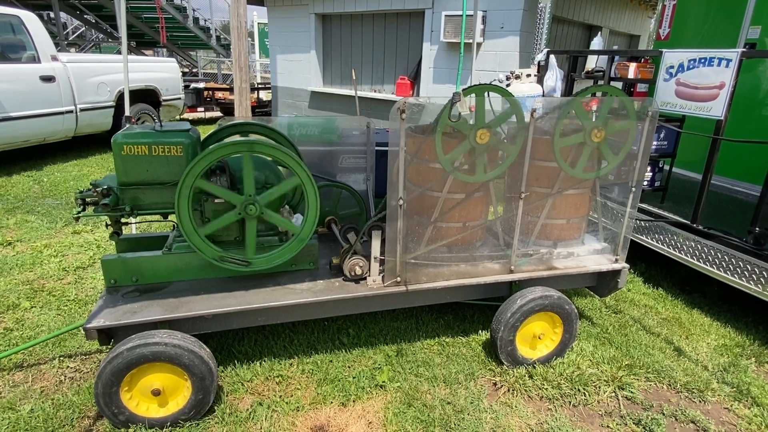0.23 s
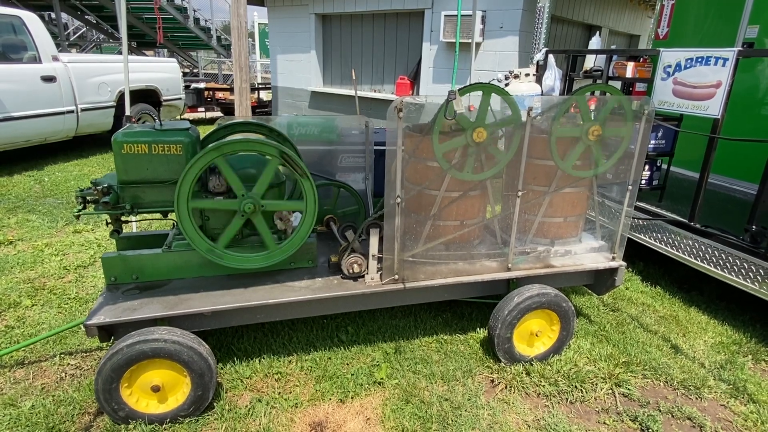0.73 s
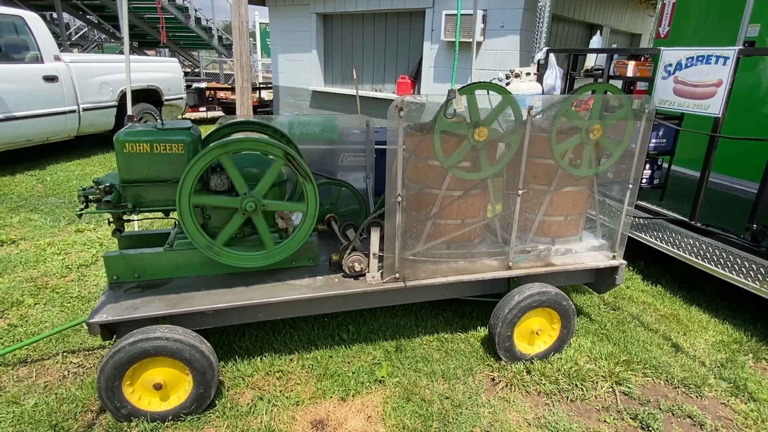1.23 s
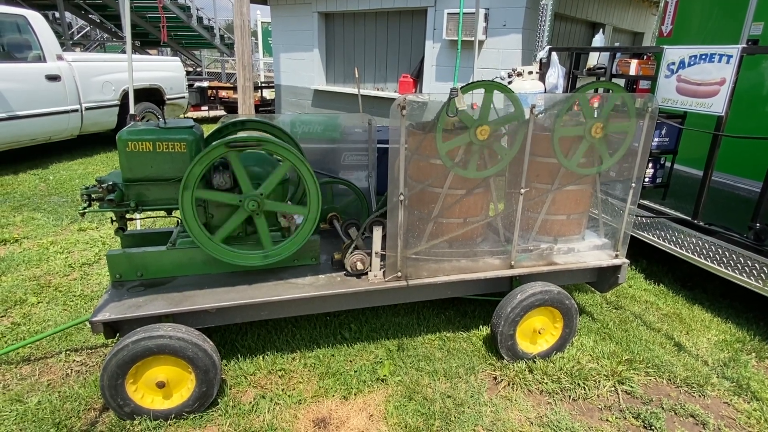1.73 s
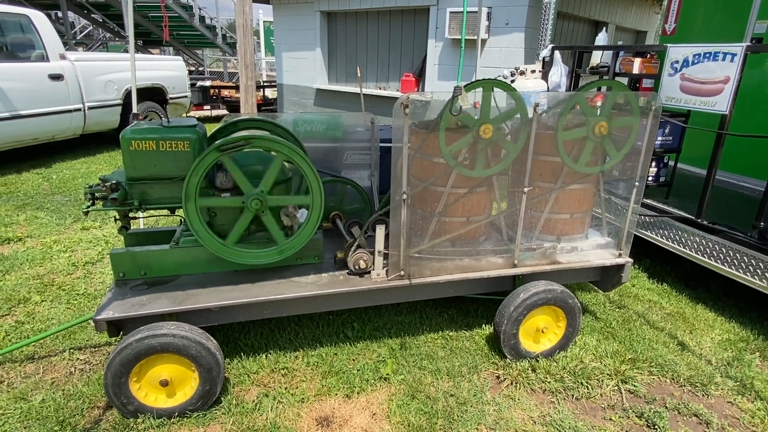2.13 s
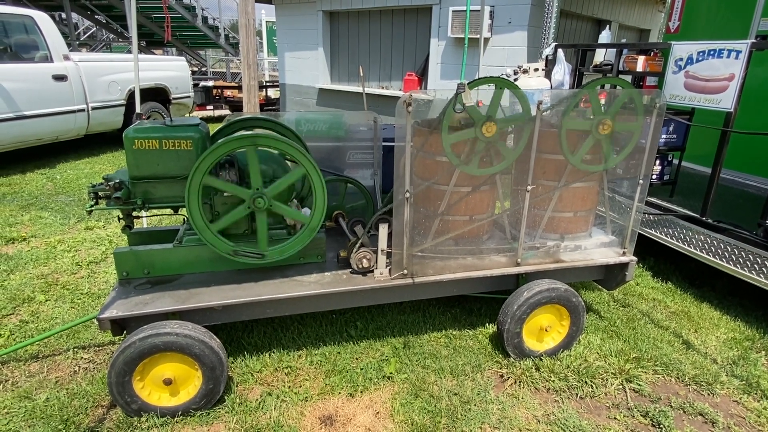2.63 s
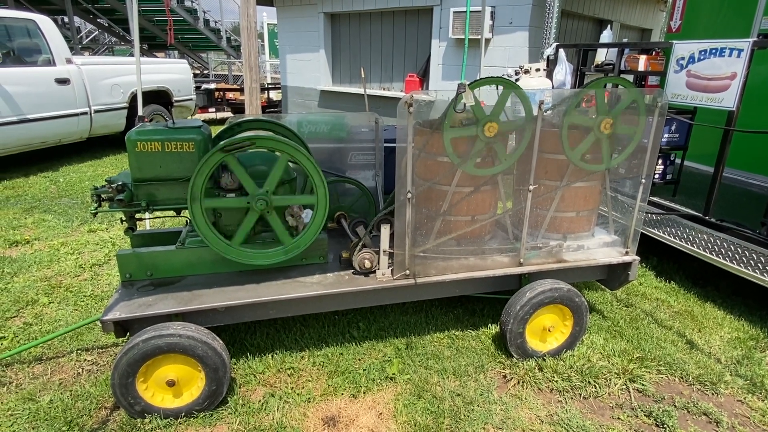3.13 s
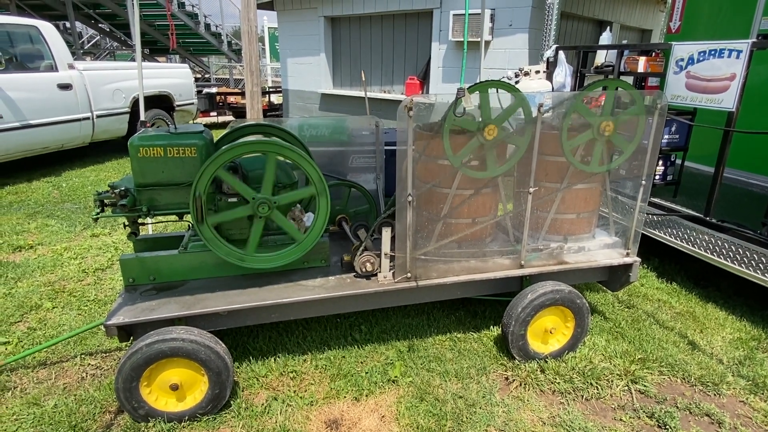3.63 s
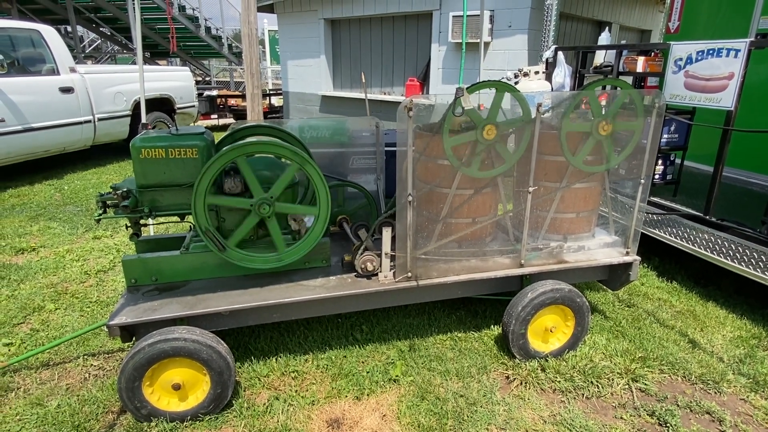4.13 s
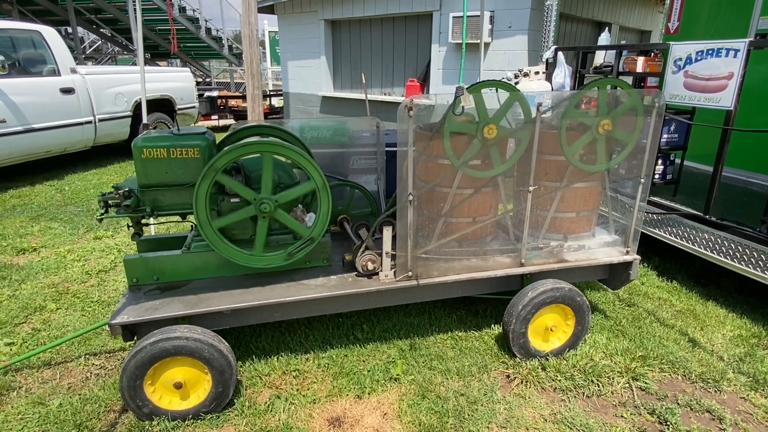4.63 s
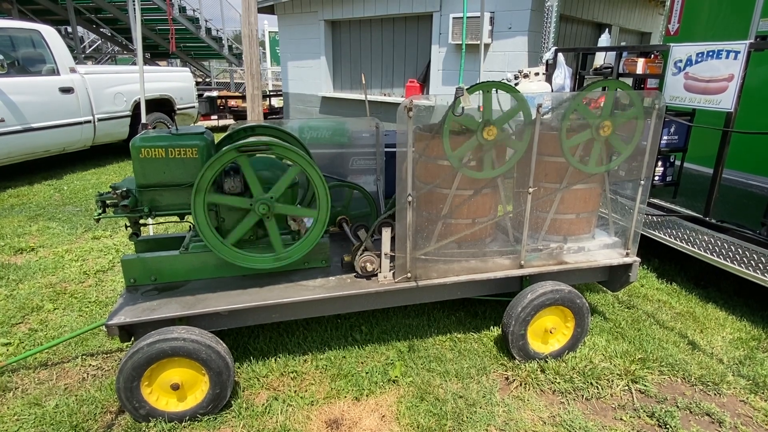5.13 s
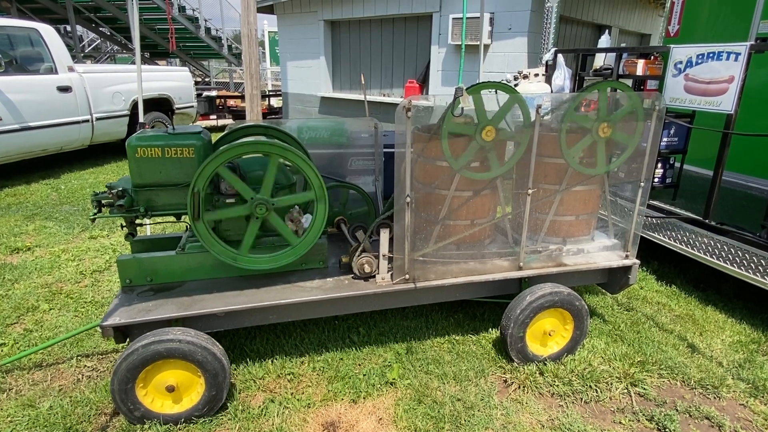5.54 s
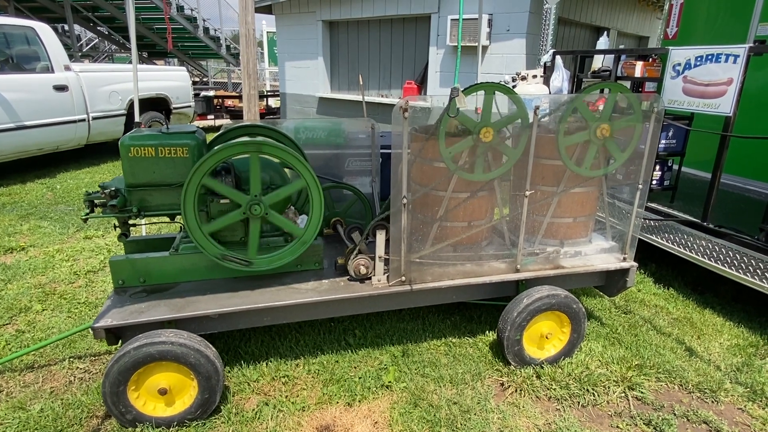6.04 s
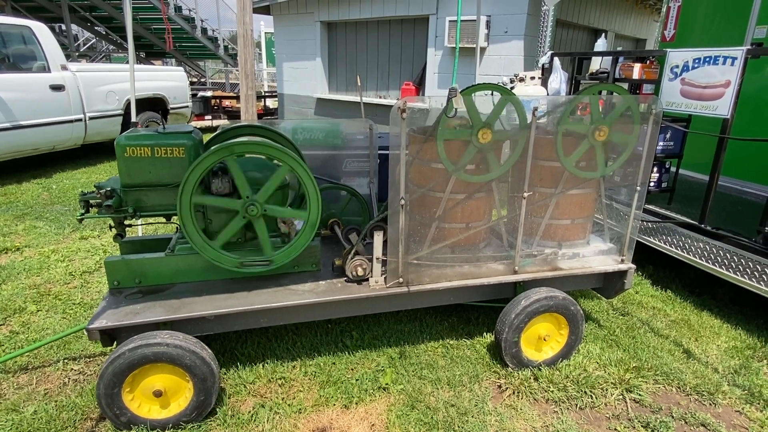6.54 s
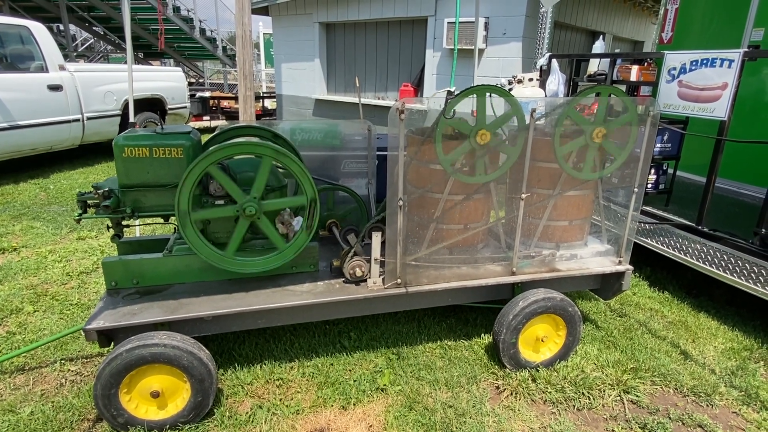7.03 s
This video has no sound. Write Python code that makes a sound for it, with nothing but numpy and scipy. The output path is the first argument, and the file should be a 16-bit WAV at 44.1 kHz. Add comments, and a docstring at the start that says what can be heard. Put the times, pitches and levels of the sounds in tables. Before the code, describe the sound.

Breathy flywheel chuffing about seven times a second, broken by three gulp-snap-bark firings, over lumpy ice grinding, knocks and a distant engine drone.

```python
"""Hit-and-miss engine turning ice cream freezers

The engine coasts ever slower between firings: each flywheel turn pumps a swish of shaped noise.
Three times it gulps (chattering noise), snaps its igniter (noise and sines), barks (noise jet, pop) and speeds up.
Ice grinds in the freezers (lumpy noise) and cracks (falling knocks); a cam grumbles, chirps and a rush come in.
Another engine drones further off (harmonics, low noise); the gain ducks under loud sounds."""
import sys
import numpy as np
from scipy import signal
from scipy.fft import rfft, irfft, next_fast_len
from scipy.io import wavfile
from scipy.ndimage import uniform_filter1d, minimum_filter1d, map_coordinates

SR = 44100
rng = np.random.default_rng(int(sys.argv[2]) if len(sys.argv) > 2 else 0)


def wav_record(signal):
    """Record a signal, one row per channel, as 16-bit PCM in the file named by sys.argv[1]."""
    frames = np.transpose(np.atleast_2d(signal))
    bounded = np.clip(frames, -1, 1)
    # unit amplitude maps onto the largest positive 16-bit level
    quanta = np.round(bounded * 32767).astype(np.int16)
    wavfile.write(sys.argv[1], SR, quanta)


N = 321048
T = np.arange(N) / SR


def amp(db):
    """Decibels to gain."""
    return 10 ** (np.asarray(db) / 20)


def unit(x):
    """Scaled to rms 1."""
    return x / np.sqrt(np.mean(x ** 2) + 1e-20)


def along(points, hz):
    """(Hz, value) points read on a log frequency axis."""
    f, v = np.transpose(points)
    return np.interp(np.log(hz + 1), np.log(f + 1), v)


def curves(rows):
    """One value per sample for each column after the time."""
    s, *cols = np.transpose(rows)
    return [np.interp(T, s, c) for c in cols]


def wobble(rate_hz):
    """Smooth random curve with rate_hz knots a second."""
    knots = rng.standard_normal(int(N * rate_hz / SR) + 4)
    return map_coordinates(knots, [T * rate_hz])


def filtered(x, response):
    """x times a response of frequency."""
    size = next_fast_len(N + 8192)
    hz = np.fft.rfftfreq(size, 1 / SR)
    return irfft(rfft(x, size) * response(hz), size)[..., :N]


def noise(spectrum, grain=1, ripple_db=0, spacing_hz=55):
    """Two unrelated noises, jointly rms 1; grain clumps them, ripple_db makes the colour randomly uneven."""
    knots = rng.standard_normal(2000)

    def colour(hz):
        ripple = np.interp(hz / spacing_hz, np.arange(len(knots)), knots)
        return amp(along(spectrum, hz) + ripple_db * ripple)
    return unit(filtered(grain * rng.standard_normal((2, N)), colour))


def resonances(modes):
    """Two unrelated noises, jointly rms 1, ringing in (Hz, width Hz, dB) modes."""
    def body(hz):
        return sum(amp(db) * 1j * hz * w / (c * c - hz * hz + 1j * hz * w) for c, w, db in modes)
    return unit(filtered(rng.standard_normal((2, N)), body))


def patchy(x, depth_db):
    """Colour shifts in random patches some hundred Hz wide and about half a turn long."""
    z = signal.stft(x, nperseg=512)[2]
    field = uniform_filter1d(rng.standard_normal(z.shape[1:]), size=5, axis=0)
    field = uniform_filter1d(field, size=11, axis=1)
    return unit(signal.istft(z * amp(depth_db * unit(field)), nperseg=512)[1][:, :N])


def burst(s, rise, hold, t60):
    """Envelope that opens at s, stays open until hold, then dies away (all in s)."""
    age = np.maximum(T - s, 0)
    return np.minimum(age / rise, 1) * amp(-60 * np.clip((age - hold) / t60, 0, 3))


def lobe(turns, at, sharp):
    """Swell once a turn, centred on the angle at (turns)."""
    return np.exp(sharp * (np.cos(2 * np.pi * (turns - at)) - 1))


KNOCK_STRETCH = 0.361  # growth of the period, s per s


def knock(top_hz, end_hz):
    """A few cycles that fall in pitch from top_hz and die out around end_hz."""
    age = np.arange(SR // 30) / SR
    hz = 1 / (1 / top_hz + age * KNOCK_STRETCH)
    cycles = np.cumsum(hz) / SR
    envelope = np.minimum(2 * cycles, 1) * np.sqrt(hz / top_hz) / (1 + (end_hz / hz) ** 6)
    return np.sin(2 * np.pi * cycles) * envelope


def add(track, s, sound):
    """Mixes a short sound into a track at time s."""
    track[round(s * SR):][:len(sound)] += sound


# firings; exhaust levels are before its common gain:
# ignition t/s, snap level/dB, jet level/dB, pipe ring level/dB, thump level/dB, pop level/dB, pop end f/Hz
FIRINGS = [(0.61, -11, -5.5, -10.5, -31, -20, 450), (3.308, -13, -5, -30, -32.5, -38, 450),
           (5.7373, -12, -5.5, -32, -19, -21, 190)]
START_TURNS, START_TURNS_PER_S = -.1122, 7.0992
DRAG_TURNS_PER_S2, KICK_TURNS_PER_S, POWER_S = .555, 1.4173, .06


def crank():
    """Flywheel angle (turns) and speed (turns/s): steady drag, each firing kicks it on."""
    kicks = sum(np.clip((T - s) / POWER_S, 0, 1) for s, *_ in FIRINGS)
    speed = START_TURNS_PER_S - DRAG_TURNS_PER_S2 * T + KICK_TURNS_PER_S * kicks
    return START_TURNS + np.cumsum(speed) / SR, speed


# slow drift of the swish: t/s, level change/dB
SWISH_DRIFT = [(0, 0.4), (2.9, -0.5), (3.7, 1.5), (4.85, -9.5), (5.1, -2), (6, 1), (7.28, -1)]
# exhaust valve: shut this long before ignition, open this long after
SHUT_S, OPEN_S, MUTE_DB = 0.084, .0675, -28
# drive at 8 turns/s, growth in dB per turn/s, random variation
SWISH_DRIVE_DB, SWISH_PER_SPEED_DB, SWISH_VARIES_DB = -27, 1, 0.65


def swish_level(speed):
    """Drive in dB: a faster piston pumps harder; hardly any air passes with the exhaust valve shut."""
    shut = sum(1.0 * ((T > s - SHUT_S) & (T < s + OPEN_S)) for s, *_ in FIRINGS)
    pumping = SWISH_DRIVE_DB + SWISH_PER_SPEED_DB * (speed - 8)
    return pumping + curves(SWISH_DRIFT)[0] + SWISH_VARIES_DB * wobble(7.1) + MUTE_DB * shut


# air colour: f/Hz, relative level/dB per Hz
SWISH_COLOUR = [(100, -34), (300, -29), (600, -8.5), (1100, -7), (1400, -1), (2100, -1.5), (2700, -2),
                (4100, -3), (5000, -4.5), (6200, -7.5), (7000, -0.5), (7700, -7), (8700, -9), (11500, -10),
                (15500, -23)]
# exhaust passage modes: f/Hz, width/Hz, relative level/dB
WHISTLE_MODES = [(4490, 84, -7.5), (4603, 38, -2), (4900, 50, -3.5), (5040, 330, -2)]
# bearing colour: f/Hz, relative level/dB per Hz
HISS_COLOUR = [(30, -17), (250, -8), (450, -11.5), (900, -13), (1400, 0.5), (2100, -1.5), (3500, -6),
               (5000, -5.5), (7500, -6.5), (8300, -2), (9300, -1.5), (11000, -6.5), (12200, -8),
               (15500, -12.5)]


def coasting():
    """Piston pushes air through the open exhaust valve, draws it back softer; passage sings, bearings hiss."""
    turns, speed = crank()
    db = swish_level(speed)
    stroke = lobe(turns, at=0.012, sharp=1.86) + amp(-6.5) * lobe(turns, at=0.46, sharp=1.28)
    air = patchy(noise(SWISH_COLOUR, grain=amp(0.66 * wobble(700)), ripple_db=4), depth_db=3.0)
    swish = amp(db - 2.5) * stroke * air

    whistle = sum(amp(mode[2] + 2.1 * wobble(13)) * resonances([mode]) for mode in WHISTLE_MODES)
    singing = lobe(turns, at=-0.021, sharp=2.44) + amp(-10.5) * lobe(turns, at=0.35, sharp=2.0)

    # swells with the stroke, eases just before it
    load_db = 4.8 * lobe(turns, at=0, sharp=7.2) - 3 * lobe(turns, at=-0.2, sharp=7.2)
    hiss = patchy(noise(HISS_COLOUR, ripple_db=3), depth_db=3)
    bearings = hiss * amp(-38.5 + load_db + 1.7 * wobble(400))
    return swish + amp(db - 9) * singing * whistle + bearings


# cam gear colour: f/Hz, relative level/dB per Hz
CAM_COLOUR = [(100, -19), (300, -14), (600, 0.5), (1000, -3), (1700, 6), (3000, -29), (9000, -35)]
CAM_PEAK_DB = -40


def cam():
    """Half-speed gear grumbles as its cam passes the push rod, every second turn."""
    grumble = noise(CAM_COLOUR, grain=amp(3.0 * wobble(300)))
    return amp(CAM_PEAK_DB) * lobe(crank()[0] / 2, at=0.512, sharp=22) * grumble


# grinding effort, also sizes the small cracks: t/s, level/dB before trims
CHURNING = [(0, -33), (.55, -36), (1, -34.5), (1.3, -37), (2.3, -35.5), (2.42, -38.5), (2.7, -44),
            (3.3, -43), (4.5, -52), (4.95, -46), (5.65, -41), (6.55, -38.5), (7.28, -46.5)]
# ice colour: f/Hz, relative level/dB per Hz
CHURN_COLOUR = [(80, -22), (240, -4.5), (380, -10), (550, 1.5), (690, 1), (850, 0), (1100, -3),
                (1400, -2.5), (2500, -8), (6500, -12), (9000, -53)]


def freezers():
    """Dashers grind lumpy ice, pushed a little by every turn and more by every second one."""
    churn_db, = curves(CHURNING)
    turns = crank()[0]
    push = 1 + 0.33 * lobe(turns, at=0.02, sharp=2.0) + 0.43 * lobe(turns / 2, at=0.48, sharp=3.9)
    ice = patchy(noise(CHURN_COLOUR, grain=amp(2.6 * wobble(180))), depth_db=2.6)
    return ice * amp(churn_db + 2.0 + 1.26 * wobble(35)) * push


# tub modes: f/Hz, width/Hz, relative level/dB
TUB_MODES = [(560, 110, -2), (865, 130, 0)]
# tub ringing: t/s, level/dB
TUB_LEVEL = [(0, -43), (2.35, -41), (2.7, -53), (4, -64)]


def tubs():
    """Packed ice rubs the tub walls in lumps and rings them, until it loosens."""
    return resonances(TUB_MODES) * amp(curves(TUB_LEVEL)[0] + 3 * wobble(45))


# loud cracks: t/s, level/dB, top f/Hz (low: dull knock)
LOUD_CRACKS = [(2.319, -24, 1300), (2.334, -26.5, 1400), (2.3483, -15, 1370), (2.363, -21, 1930),
               (2.411, -28, 900), (2.452, -22, 1970), (2.479, -32, 1100), (2.53, -27, 1190),
               (2.555, -25, 1590), (2.572, -24.5, 1390), (2.589, -32, 1000), (2.985, -30, 1490),
               (3.1185, -22, 2170), (3.1552, -7.5, 7500), (4.461, -35, 1380), (5.268, -23, 3960),
               (6.108, -23, 1310), (6.653, -34, 1300), (7.149, -36, 1490)]
# crunch colour: f/Hz, relative level/dB per Hz
CRUNCH_COLOUR = [(100, -9), (500, 0), (1500, 1), (3000, -11), (6000, -10), (14000, -32)]
CRUNCH_REL_DB = -15.5  # re its crack
KNOCK_END_HZ, KNOCK_ROUGH_DB, KNOCK_ROUGH_HZ = 337, 3, 900
# small cracks: level is re CHURNING
CRACKLES_PER_S, CRACKLE_REL_DB, CRACKLE_SCATTER_DB, CRACKLE_HZ = 25, 1, 0.5, 1950
FREEZER_LAG_S = 0.00044  # freezers stand to the right: left microphone hears cracks late


def cracks():
    """Ice knocks fall in pitch, often faint; the few loud ones are ragged and leave a short crunch."""
    small = rng.random(N) < CRACKLES_PER_S / SR
    sizes = amp(curves(CHURNING)[0] + CRACKLE_REL_DB + CRACKLE_SCATTER_DB * rng.standard_normal(N))
    crackle = signal.fftconvolve(small * sizes, knock(CRACKLE_HZ, KNOCK_END_HZ))[:N]

    loud, crunch = np.zeros(N), 0
    for s, db, top_hz in LOUD_CRACKS:
        add(loud, s, amp(db) * knock(top_hz, KNOCK_END_HZ))
        crunch = crunch + amp(db + CRUNCH_REL_DB) * burst(s, rise=0.00044, hold=.002, t60=0.058)
    ragged = loud * amp(KNOCK_ROUGH_DB * wobble(KNOCK_ROUGH_HZ))

    right = crackle + ragged
    left = filtered(right, lambda hz: np.exp(-2j * np.pi * hz * FREEZER_LAG_S))
    return np.array([left, right]) + crunch * noise(CRUNCH_COLOUR)


# cycle rate: t/s, f/Hz
IDLE_RATE = [(0, 13.55), (.6, 13.7), (1, 13.52), (2.2, 13.5), (2.7, 13.5), (3.3, 13.52), (4.6, 13.49),
             (5.2, 13.47), (6, 13.72), (7.28, 13.66)]
# drone harmonics: multiple of cycle rate, relative level/dB
DRONE_HARMONICS = [(5, -25), (6, -24), (7, -23), (8, -10), (9, -24.5), (10, -19.5), (11, -5), (12, -2),
                   (13, -25), (14, -21)]
# drone drive, sets the rumble too: t/s, level/dB
DRONE_LEVEL = [(0.0, -33), (0.6, -42.5), (2.12, -33), (2.32, -47.5), (2.82, -48), (3.12, -45.5),
               (4.44, -51), (4.54, -47.5), (5.24, -35), (6.12, -33.5), (6.22, -43.5), (6.62, -30),
               (6.72, -40), (7.28, -45)]
# deep throb drive: t/s, level/dB
THROB_LEVEL = [(0.0, -37.5), (1.22, -46.5), (2.52, -45), (2.72, -49), (3.12, -46), (4.36, -53.5),
               (6.76, -46), (7.28, -52)]
# rumble with the drone: f/Hz, relative level/dB per Hz
RUMBLE_COLOUR = [(20, -30), (40, -40), (60, -22), (105, 10), (160, 6.5), (220, 0), (400, -5), (1000, -78)]
# noise with the throb: f/Hz, relative level/dB per Hz
DEEP_COLOUR = [(20, -32), (40, -21), (55, -18), (70, -2.5), (110, -2), (200, -20), (600, -49)]
IDLE_START_TURNS = .07  # of a cycle


def idler(beat_hz=50.0):
    """Distant many-cylinder engine: drone swells once a cycle, a low tone beats against its firing tone."""
    drone_db, throb_db = curves(DRONE_LEVEL)[0], curves(THROB_LEVEL)[0]
    angle = 2 * np.pi * (IDLE_START_TURNS + np.cumsum(curves(IDLE_RATE)[0]) / SR)
    drone = sum(amp(db + 1.6 * wobble(10)) * np.sin(round(k) * angle) for k, db in DRONE_HARMONICS)
    firing = np.sin(4 * angle)
    beat = amp(-21) * np.sin(2 * np.pi * beat_hz * T)
    tones = amp(drone_db) * drone + amp(throb_db) * (firing + beat)
    rumble = noise(RUMBLE_COLOUR) * amp(drone_db - 5.5) + noise(DEEP_COLOUR) * amp(throb_db)
    return rumble + np.array([np.sqrt(2) * tones, np.zeros(N)])


# narrow band modes: f/Hz, width/Hz, relative level/dB
RUSH_MODES = [(1306, 83, 1), (1404, 47, -1)]
# low body colour: f/Hz, relative level/dB per Hz
RUSH_COLOUR = [(130, -25), (240, 0.5), (310, 1.5), (400, -1), (570, -0.5), (800, -14), (1500, -30)]
# rush: t/s, band level/dB, body level/dB
RUSH_LEVEL = [(3.6, -56, -63), (4.7, -50.5, -55), (5.5, -43.5, -45.5), (5.68, -33, -34), (5.72, -39, -40),
              (5.95, -38, -43), (6.55, -42.5, -41.5), (7.28, -49, -51)]
FLUTTER_DB = 2.8


def rush():
    """Hollow rush swells behind the engine: narrow fluttering band over a low body."""
    band_db, body_db = curves(RUSH_LEVEL)
    band = resonances(RUSH_MODES) * amp(band_db + FLUTTER_DB * wobble(22))
    return band + noise(RUSH_COLOUR) * amp(body_db + 1.4 * wobble(30))


# gulps before common gain: t/s, length/s, level/dB, mixer ring re air/dB, pipe ring re air/dB
GULPS = [(.485, 0.017, -16, 2, -10), (.517, 0.015, -15, -5, -6), (0.5435, .003, -24, -5, -8),
         (3.18, 0.02, -17.5, -4, -14), (3.2135, 0.016, -15.5, -10, -16), (3.237, .003, -25, -4, -5),
         (3.264, .002, -31, -7, -9), (5.609, 0.021, -16.5, -2.5, -6), (5.643, 0.013, -16, -5.5, -4),
         (5.669, .003, -21.5, -4, -5)]
# air colour: f/Hz, relative level/dB per Hz
GULP_COLOUR = [(80, -27), (300, -5.5), (600, -4), (1000, -16), (1500, -9), (2200, -3.5), (3000, -1),
               (3800, -5), (4700, 0), (7200, 0), (8500, -5.5), (11000, -2.5), (15500, -9.5)]
# mixer modes: f/Hz, width/Hz, relative level/dB
MIXER_MODES = [(2150, 350, 6), (2670, 540, -1), (4800, 200, -1), (6200, 310, -1), (7000, 220, -1)]
# intake pipe mode: f/Hz, width/Hz, relative level/dB
INTAKE_PIPE_MODES = [(1450, 180, 0)]
CHATTER_HZ, CHATTER_UNEVEN_DB, CHATTER_DB = 160, 3, 9


def intake():
    """Before each firing the suction valve chatters; air rasps in through the ringing mixer and pipe."""
    flow = ring = honk = 0
    for s, length, db, mixer_db, pipe_db in GULPS:
        tail = amp(-27.0) * burst(s, rise=0.0064, hold=length, t60=0.17)
        gulp = amp(db) * (burst(s, rise=0.0061, hold=length, t60=0.07) + tail)
        flow = flow + gulp
        ring = ring + amp(mixer_db) * gulp
        honk = honk + amp(pipe_db) * gulp
    strike_rate = CHATTER_HZ * amp(CHATTER_UNEVEN_DB * wobble(CHATTER_HZ))
    since_strike = np.cumsum(strike_rate) / SR % 1
    chatter = unit(amp(-CHATTER_DB * since_strike))
    air = noise(GULP_COLOUR, grain=chatter, ripple_db=2.5, spacing_hz=70.1)
    ringing = ring * resonances(MIXER_MODES) + honk * resonances(INTAKE_PIPE_MODES)
    return amp(-3.0) * (flow * air + chatter * ringing)


# steel colour: f/Hz, relative level/dB per Hz
SNAP_COLOUR = [(200, -2), (800, -18), (1400, -5.5), (2000, 5.5), (3000, -7.5), (4200, 6), (5300, 3.5),
               (6500, 3.5), (8000, -5), (10500, 2), (12500, -5.5), (15500, -1.5)]
# spring partials: f/Hz, relative level/dB, t60/s
SPRING = [(7000, -15, 0.11), (10590, -5.5, 0.09), (12200, -20, 0.11)]


def igniter():
    """Trip lets go with a steel snap, the rod rattles briefly, the spring rings on."""
    crack, ring = np.zeros(N), np.zeros((2, N))
    for s, db, *_ in FIRINGS:
        snap = burst(s, rise=.0004, hold=.003, t60=.025)
        rattle = amp(-12.5) * burst(s, rise=0.01, hold=0.012, t60=0.2)
        crack += amp(db) * (snap + rattle)
        for hz, level, t60 in SPRING:
            phase = rng.uniform(0, 2 * np.pi, (2, 1))
            envelope = amp(db + level - 3.5) * burst(s, rise=0.0012, hold=.001, t60=t60)
            ring += envelope * np.sin(2 * np.pi * hz * T + phase)
    return crack * noise(SNAP_COLOUR, ripple_db=2, spacing_hz=130) + ring


# jet colour: f/Hz, relative level/dB per Hz
BARK_COLOUR = [(30, -30), (75, -8), (300, -44), (600, -10.5), (1050, -7), (1400, -3.5), (2300, -4.5),
               (3900, -1), (5000, -2), (6100, -1.5), (8200, -4.5), (11500, -4.5), (15500, -6)]
# exhaust port modes: f/Hz, width/Hz, relative level/dB
PORT_MODES = [(1296, 37, -9), (2330, 140, 2), (3210, 130, -1.5), (3690, 230, -3), (4630, 190, 2.5),
              (5090, 140, 1), (6800, 280, -5), (7200, 130, -5), (9100, 140, 0)]
# push rod modes: f/Hz, width/Hz, relative level/dB
TAPPET_MODES = [(1300, 200, -6), (2160, 420, 9), (2800, 400, 6), (5500, 1500, -22)]
# exhaust pipe modes: f/Hz, width/Hz, relative level/dB
PIPE_MODES = [(540, 45, 6.5), (826, 31, 12.5)]
# thump colour: f/Hz, relative level/dB per Hz
THUMP_COLOUR = [(20, -16), (45, -16), (110, 1), (180, 4), (260, 3), (350, -5), (550, -1), (1000, -37),
                (4000, -54)]
PORT_REL_DB, TAPPET_REL_DB = -6.5, -24.5  # re jet
TAPPET_LEAD_S, POP_LEAD_S, POP_TOP_HZ = 0.016, 0.0023, 845  # leads are before the valve opens


def exhaust():
    """Push rod ticks, valve opens with a pop; gas jet rings port and pipe over a thump, walls answer faintly."""
    jet = ring = push = tick = 0
    pops = np.zeros((2, N))
    for ignition, _, jet_db, ring_db, thump_db, pop_db, end_hz in FIRINGS:
        s = ignition + OPEN_S
        walls = amp(-29.0) * burst(s, rise=0.033, hold=0.026, t60=1.0)
        jet = jet + amp(jet_db) * (burst(s, rise=0.0055, hold=0.016, t60=0.12) + walls)
        tap = burst(s - TAPPET_LEAD_S, rise=0.0018, hold=0.0067, t60=0.099)
        tick = tick + amp(jet_db + TAPPET_REL_DB) * tap
        ring = ring + amp(ring_db) * burst(s, rise=0.0021, hold=0.0095, t60=0.069)
        push = push + amp(thump_db) * burst(s, rise=0.00077, hold=0.0023, t60=0.099)
        # first channel only: common to both microphones
        add(pops[0], s - POP_LEAD_S, amp(pop_db) * knock(POP_TOP_HZ, end_hz))
    hard_gas = noise(BARK_COLOUR, grain=amp(1.3 * wobble(880)), ripple_db=3.5, spacing_hz=82.0)
    gas = patchy(unit(hard_gas + amp(PORT_REL_DB) * resonances(PORT_MODES)), depth_db=1.0)
    ringing = tick * resonances(TAPPET_MODES) + ring * resonances(PIPE_MODES)
    return amp(2.0) * (jet * gas + ringing + push * noise(THUMP_COLOUR) + 2 * pops)


# chirps: centre t/s, length/s, f/Hz, level/dB
CHIRPS = [(0.98, 0.039, 4840, -27.5), (1.252, .02, 6300, -48), (1.524, 0.021, 6550, -41),
          (1.683, .02, 6550, -45), (1.98, 0.017, 6660, -44), (2.213, .025, 6470, -39)]
CHIRP_WIDTH_HZ = 96


def chirps():
    """Now and then something on the engine gives a thin, hoarse chirp: narrow noise in a bell envelope."""
    total = 0
    for s, length, hz, db in CHIRPS:
        envelope = amp(db) * np.exp(-(2 * (T - s) / length) ** 2)
        total = total + envelope * resonances([(hz, CHIRP_WIDTH_HZ, 0)])
    return total


# pair phase: f/Hz, left lead/rad
LEAD = [(50, -.6), (150, 0), (370, 0), (450, 2.9), (700, 2.7), (1250, 1.6), (1900, 4.1), (3200, 3.8),
        (3700, 6.2), (4500, 6.4), (4800, 8.2), (5700, 9.5), (6300, 12.2), (7500, 13), (8100, 15.8),
        (9500, 8.4), (10600, 6.5), (11600, 6.1), (13200, 3.2), (15100, 0)]
# pair likeness: f/Hz, coherence
COHERENCE = [(70, 0.79), (170, 0.45), (400, 0.049), (700, 0.52), (900, 0.57), (1400, 0.55), (2500, 0.38),
             (4300, 0.051), (5200, 0.42), (7000, 0.38), (9000, 0.39), (11000, 1), (12300, 0.82),
             (13200, .98), (14300, .8), (15500, 0.5)]
# pair balance: f/Hz, left minus right level/dB
BALANCE = [(170, -6.5), (300, -5), (420, -0.5), (1500, 1), (2000, -1), (3000, 0.5), (7000, -1.5),
           (8300, -8.5), (10800, -0.5)]


def microphones(pair):
    """First signal is heard in common, second as difference, with the pair's own phase and balance."""
    def mix(hz):
        turn = np.arccos(np.clip(along(COHERENCE, hz), 0, 1)) / 2
        return np.array([np.cos(turn), np.sin(turn)])

    def response(hz):
        tilt = amp(along(BALANCE, hz) / 2) * np.exp(.5j * along(LEAD, hz))
        sides = np.array([tilt, 1 / tilt])
        return sides / np.sqrt(np.mean(abs(sides) ** 2, axis=0))
    common, apart = filtered(pair, mix)
    return filtered(np.array([common + apart, common - apart]), response)


def scene():
    """Everything that reaches the microphones; cracks carry their own stereo."""
    steady = coasting() + cam() + freezers() + tubs() + idler() + rush()
    events = intake() + igniter() + exhaust() + chirps()
    return microphones(steady + events) + cracks()


def gain_control(x, limit_db=-11, hold_s=0.13, release_s=0.1):
    """Gain drops at once under a loud sound, waits, then climbs back."""
    power = uniform_filter1d(np.mean(x ** 2, axis=0), size=176)
    level_db = 10 * np.log10(abs(power) + 1e-12)
    cut_db = np.minimum(limit_db - level_db, 0)
    span, slope = int(hold_s * SR) | 1, int(release_s * SR) | 1
    held = minimum_filter1d(cut_db, span, origin=span // 2)
    climbing = uniform_filter1d(held, slope, origin=slope // 2)
    return x * amp(uniform_filter1d(np.minimum(held, climbing), size=64))


LOW_CUT_HZ, TOP_HZ = 29, 15780


def record(dry):
    """Cuts the deepest bass, rides the gain, rounds off the highest peaks, drops all from TOP_HZ up."""
    level = gain_control(filtered(dry, lambda hz: 1 - 1 / (1 + (hz / LOW_CUT_HZ) ** 4)))
    rounded = level / (1 + abs(level / .9) ** 6) ** (1 / 6)
    return filtered(rounded, lambda hz: hz < TOP_HZ)


dry = scene()
out = record(dry)
wav_record(out)
```